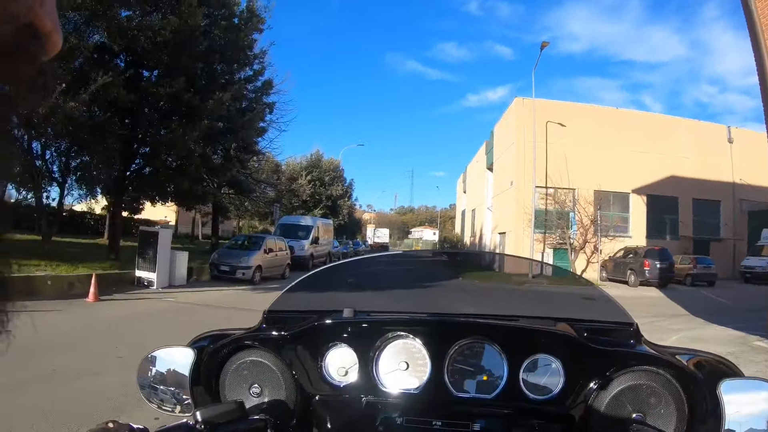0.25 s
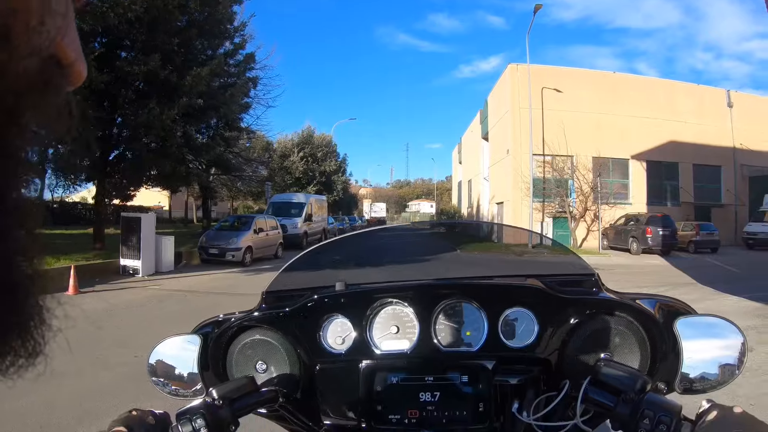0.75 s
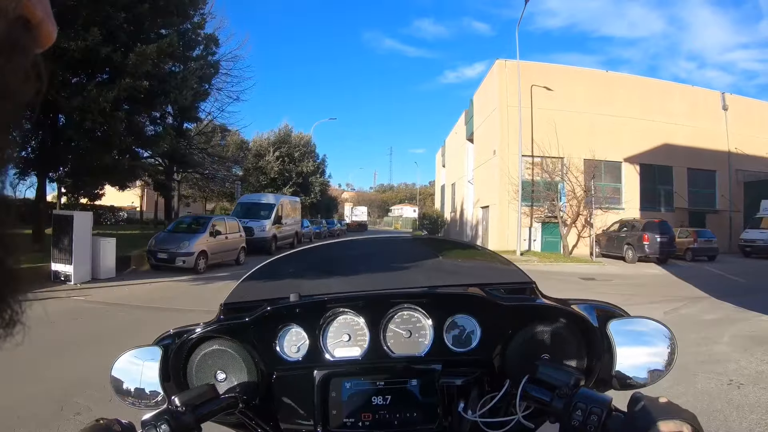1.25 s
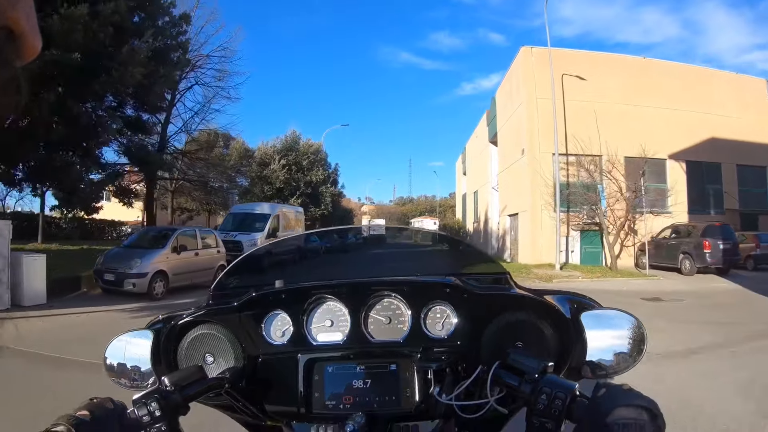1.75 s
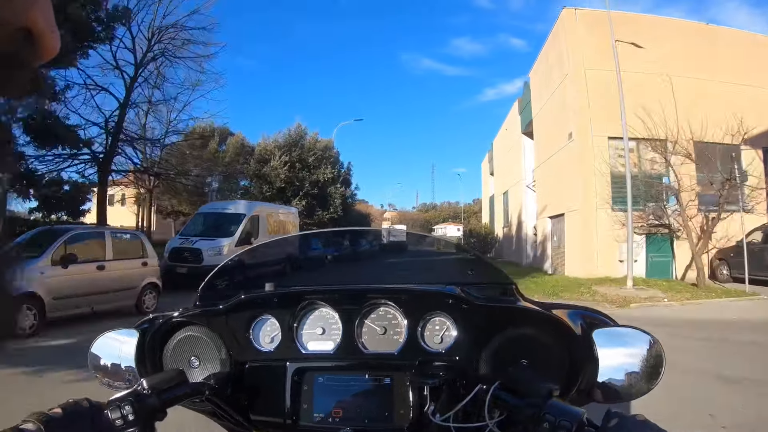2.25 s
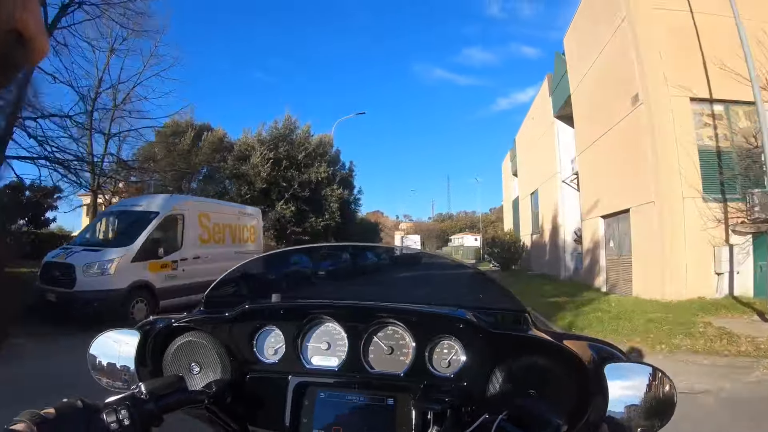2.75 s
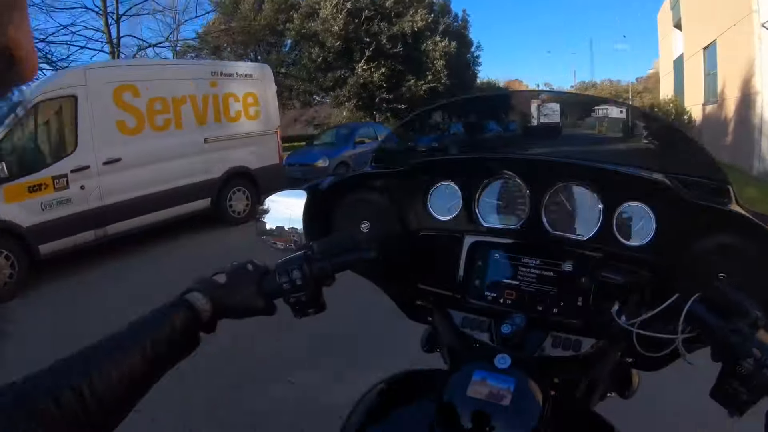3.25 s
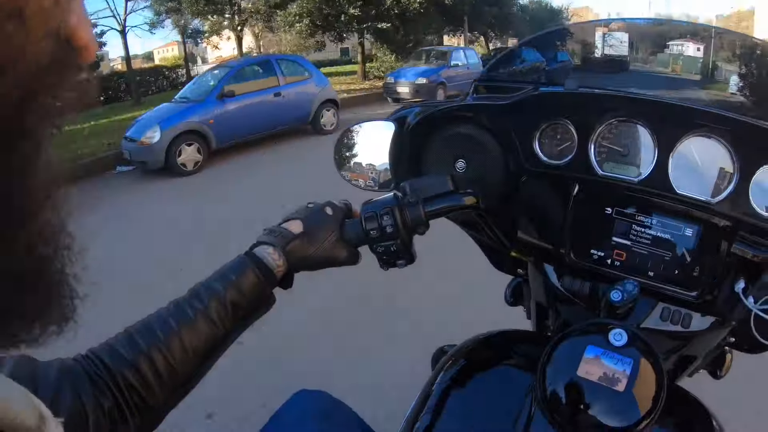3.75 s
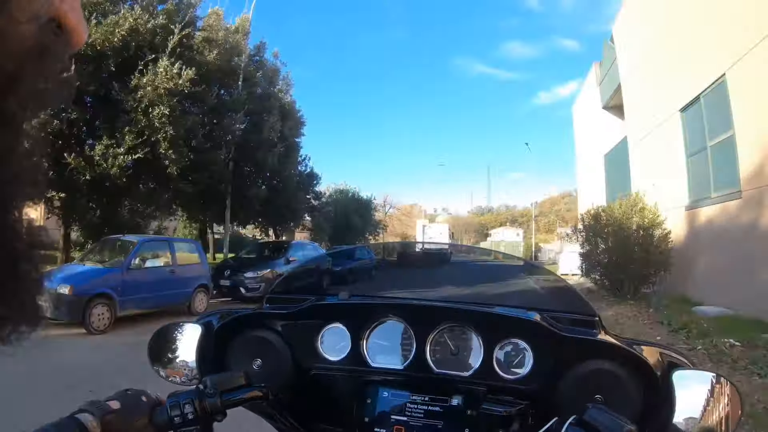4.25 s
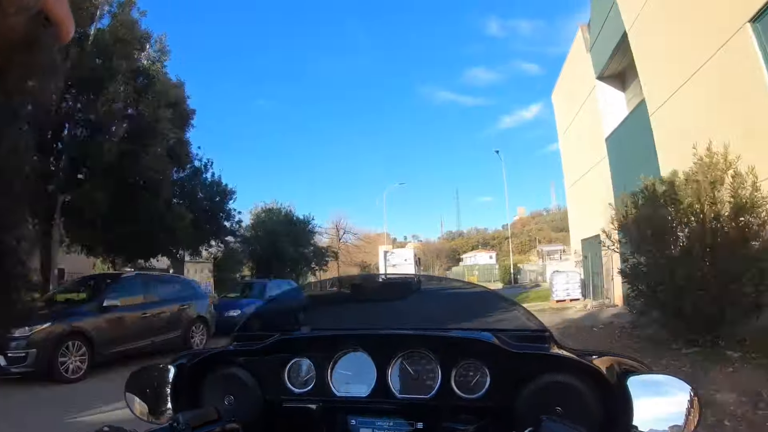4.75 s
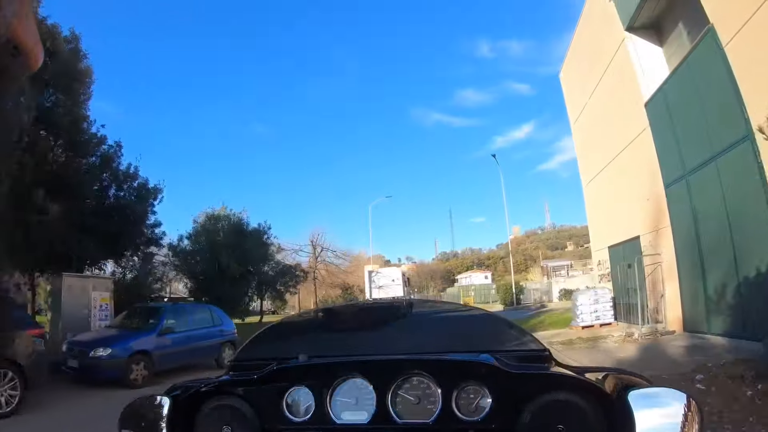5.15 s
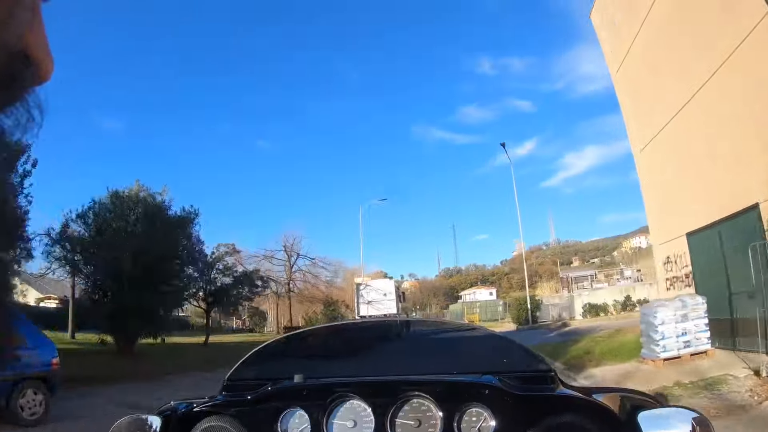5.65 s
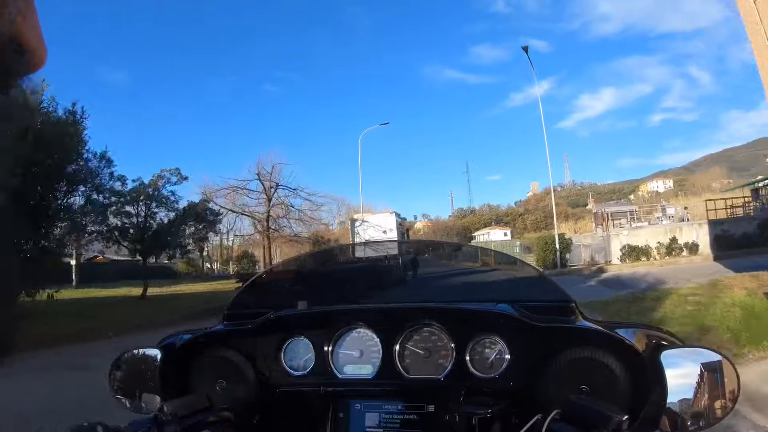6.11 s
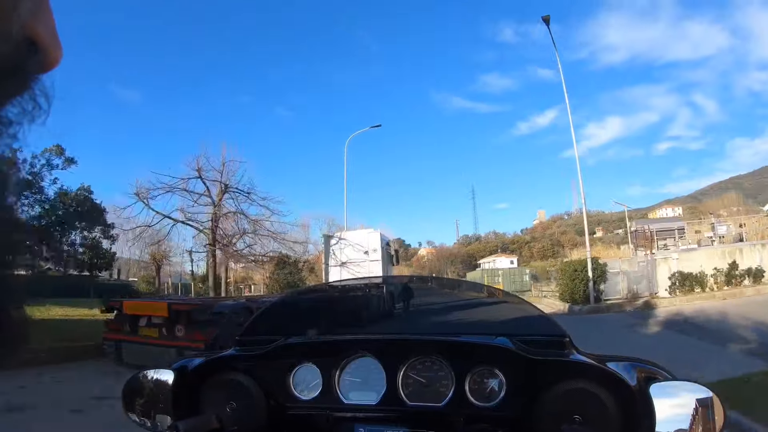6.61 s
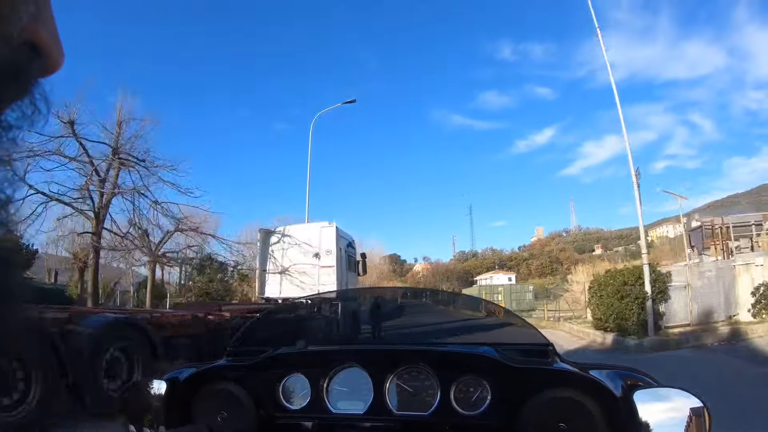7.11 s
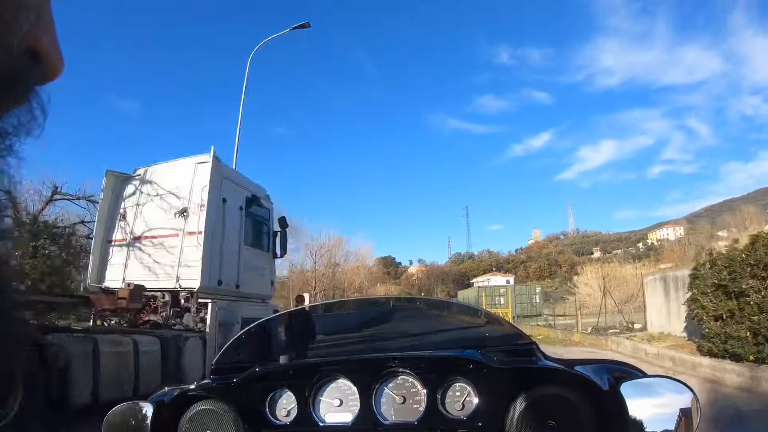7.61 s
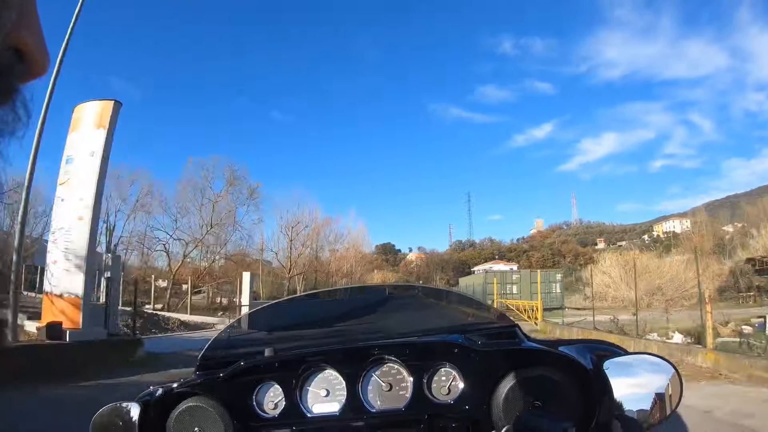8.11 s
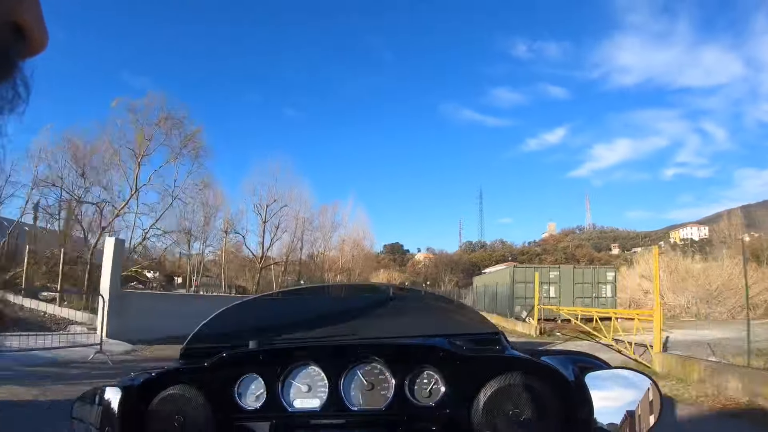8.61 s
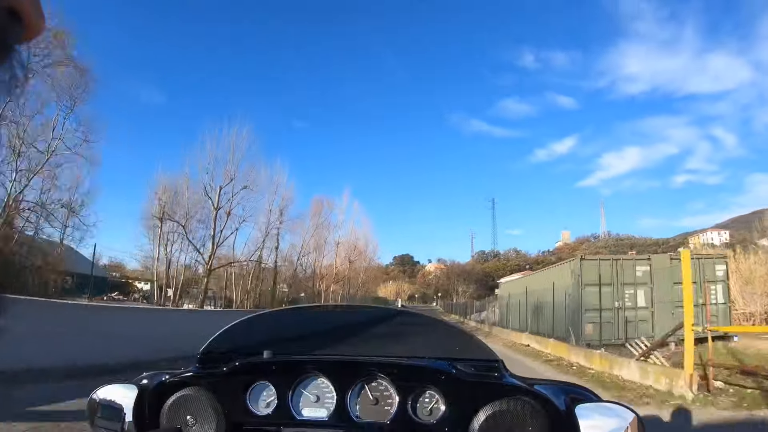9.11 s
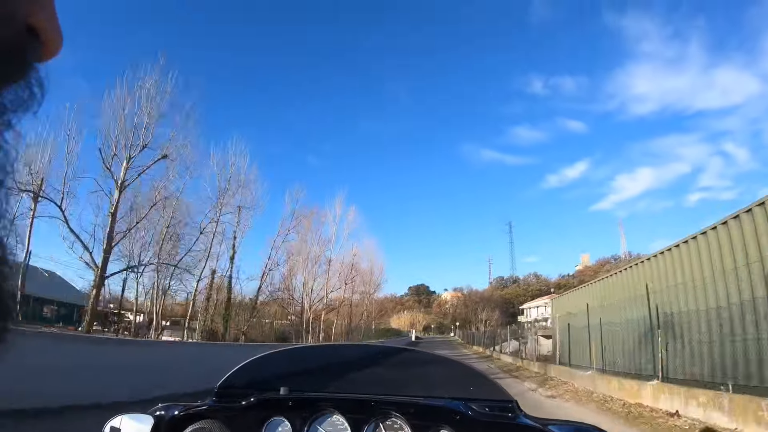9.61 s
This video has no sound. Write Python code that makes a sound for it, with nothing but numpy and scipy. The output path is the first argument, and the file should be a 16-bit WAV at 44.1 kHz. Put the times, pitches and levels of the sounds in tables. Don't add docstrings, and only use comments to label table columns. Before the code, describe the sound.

Heard from the rider's helmet, a heavy motorcycle thumps, roars and revs, drops at a gear change, then climbs again as gusts and strap snaps build.

```python
import sys
import numpy as np
from scipy import signal
from scipy.io import wavfile
from scipy.ndimage import uniform_filter1d

SR = 44100
rng = np.random.default_rng(int(sys.argv[2]) if len(sys.argv) > 2 else 0)


def store_wav(level_fs):
    pcm = np.round(np.clip(np.atleast_2d(level_fs), -1, 1) * 32767)
    wavfile.write(sys.argv[1], SR, pcm.T.astype(np.int16))


def gain_from_db(level_db):
    decades = np.asarray(level_db, float) / 20
    return 10 ** decades


N = 435266
T = np.arange(N) / SR


def evened(x):
    return x / np.sqrt(np.mean(abs(x) ** 2) + 1e-20)


def read(points, hz):
    f, value = np.transpose(points)
    return np.interp(np.log(hz + 1), np.log(f + 1), value)


def curve(rows, column, t=T):
    rows = np.array(rows)
    return np.interp(t, rows[:, 0], rows[:, column])


def drift(per_s):
    width = round(SR / per_s)
    once = uniform_filter1d(rng.standard_normal(N), width)
    return evened(uniform_filter1d(once, width))


def ringing(hz, width, size=N):
    turn = np.exp(2j * np.pi * np.cumsum(hz * np.ones(size)) / SR)
    r = np.exp(-np.pi * width / SR)
    slow = rng.standard_normal(size) / turn
    for _ in range(2):
        slow = signal.lfilter([1], [1, -r], slow)
    return evened((turn * slow).real)


# start_s, sheltered_share (0-1)
SHELTER = [(1.25, 0.073), (1.5, 0.054), (1.8, 0.43), (4.9, 0.77), (5.05, 0.86)]
# freq_hz, likeness (-1 to 1)
SAME = [(60, 0.88), (120, 0.63), (240, 0.8), (480, 0.67), (950, -0.54), (1890, -0.76), (3770, 0.5),
        (7520, -0.17), (15000, -0.01)]
# freq_hz, left_over_right_db
LEAN = [(60, -4.5), (110, -11), (200, -7), (380, -15), (700, -7.5), (1290, 3.5), (2380, 3), (4400, -5),
        (8120, 3), (15000, 5)]


def noise(open_db, shut_db, patchy_db, size=1024):
    frames, hz = 4 * N // size + 5, np.fft.rfftfreq(size, 1 / SR)
    a, b, c, d, patches = rng.standard_normal((frames, len(hz), 5)).T
    patches = uniform_filter1d(patches, 8, 0)
    patches = evened(uniform_filter1d(patches, 10, 1))
    share = curve(SHELTER, 1, np.arange(frames) * size / 4 / SR)
    colour_db = np.outer(read(open_db, hz), 1 - share) + np.outer(read(shut_db, hz), share)
    colour = gain_from_db(colour_db)
    colour *= gain_from_db(patchy_db * patches) / np.linalg.norm(colour, axis=0)
    same = np.clip(read(SAME, hz), -.99, .99)[:, None]
    lean = gain_from_db(read(LEAN, hz) / 2)[:, None]
    colour = colour * 2 / np.sqrt(lean ** 2 + lean ** -2 + 2 * same)
    shared = (a + 1j * b) * colour
    other = (c + 1j * d) * colour
    left = lean * shared
    right = (same * shared + np.sqrt(1 - same ** 2) * other) / lean
    ports = signal.istft(np.array([left, right]), nperseg=size, noverlap=3 * size // 4)[1][:, :N]
    return ports / np.sqrt(np.mean(ports.mean(0) ** 2))


FIRST_FIRING, SECOND_FIRING = .38, .38 + 315 / 720
# cycle_multiple, level_db, extra_off_load_db
PUFF = [(1, -12, 6), (2, -19, -2), (3, -15, 0), (4, -1, 3), (5, 3, -1), (6, -.5, -2.5), (7, -3.5, -1),
        (8, 6, 0), (9, -13, 6), (10, -5, 1), (11, -9, 0.5), (12, -10, 0), (13, -18, -2), (14, -9, 0.5),
        (15, -16, -3.5), (16, -9.5, -1.5), (17, -11, 1), (18, -6, 0.5), (19, -6, 8), (20, -14, 2)]
# freq_hz, level_db
PIPE = [(20, -10), (45, -1.5), (60, 3), (75, 2.5), (90, 2.5), (110, 2.5), (135, -0.5), (165, -8.5),
        (200, -10.5), (255, -11.5), (400, -32)]
# start_s, spread_db
UNEVEN = [(0, 2), (.5, .8), (4.8, .9), (5.05, 5), (5.7, 3), (6.1, 1.5), (8.9, 2.2), (9.4, 4)]
# start_s, level_db
EFFORT = [(0, -18.5), (.1, -17), (.8, -14.5), (1.24, -15.5), (1.73, -18), (2.2, -14.5), (4.73, -15),
          (4.86, -15), (5.06, -33), (5.36, -36.5), (5.5, -25.5), (5.85, -24.5), (6.57, -17.5), (7.5, -17.5),
          (8.4, -18.5), (8.8, -16.5), (9.15, -17), (9.87, -23)]
# start_s, load (0-1)
PULL = [(0, .1), (.3, .2), (.75, 1), (1.3, .6), (1.9, 1), (3.35, 1), (3.6, 0), (5.7, 0), (6.5, 1), (9.3, 1),
        (9.65, 0)]
# start_s, level_db
ROCK = [(2.9, -46.5), (3.2, -31), (3.6, -26), (4.8, -27), (5.0, -53), (7.7, -50), (8.1, -31), (9.1, -36),
        (9.6, -28)]
SHAKE_DB, SHAKE_PER_EFFORT = -22, 0.58


def exhaust(hz, cycle):
    thump, slack = np.zeros(N, complex), 1 - curve(PULL, 1)
    for place, cylinder_db in ((FIRST_FIRING, 0), (SECOND_FIRING, -.7)):
        chances = rng.standard_normal((2, 400))
        size, late = [curve(UNEVEN, 1) * np.interp(cycle - place, np.arange(400), v) for v in chances]
        angle = cycle - place - .004 * late
        puff = np.zeros(N, complex)
        for multiple, level_db, off_load_db in PUFF:
            gain_db = level_db + off_load_db * slack + read(PIPE, multiple * hz)
            puff += gain_from_db(gain_db) * np.exp(2j * np.pi * multiple * angle)
        thump += gain_from_db(cylinder_db + size) * puff
    thump = gain_from_db(curve(EFFORT, 1)) * evened(thump) * np.exp(2j * np.pi * .05)
    shake_db = SHAKE_DB + SHAKE_PER_EFFORT * (curve(EFFORT, 1) + 16)
    shake_db = np.minimum(shake_db, 1.8 * hz - 61)
    shake = gain_from_db(shake_db + 1.2 * drift(6)) * np.exp(2j * np.pi * (2 * cycle + .08 - .25 * slack))
    shake += gain_from_db(curve(ROCK, 1) + 1.5 * drift(6)) * np.exp(2j * np.pi * (3 * cycle - .05))
    ports = gain_from_db([[-1.2], [1.2]]) * np.exp([[.12j], [-.12j]])
    return np.sqrt(2) * (ports * (thump + shake)).real


# freq_hz, level_db (per Hz)
ROAR_OPEN = [(60, -26.5), (200, 6), (360, 1), (430, -3), (545, -2), (820, -12), (1050, -14), (1730, -26.5),
             (2040, -35.5), (3300, -35), (6000, -64), (16000, -83.5)]
# freq_hz, level_db (per Hz)
ROAR_SHUT = [(60, -13), (200, 4), (350, -4), (421, -8.5), (484, -5.5), (545, 0.5), (713, -5), (1210, -17.5),
             (2000, -18.5), (3300, -33), (6500, -51), (7200, -82.5), (16000, -110)]
# freq_hz, level_db (per Hz)
HISS_OPEN = [(2500, 4.5), (3500, 0.5), (4260, -3), (5000, -5.5), (5710, -3), (6800, -8.5), (7660, -7),
             (8600, -15.5), (9460, -18), (12000, -25.5), (15500, -27.5)]
# freq_hz, level_db (per Hz)
HISS_SHUT = [(2500, -15), (3500, -13), (3750, -2), (4270, 0), (5000, -5.5), (5800, -5), (6550, -11.5),
             (6950, -25), (8500, -27.5), (10000, -41.5), (15500, -72)]
# pitch_hz, width_hz
PANELS = [(423, 24), (548, 34), (1045, 75), (1540, 110), (2040, 170), (1150, 450)]
# over_roar_db, extra_under_load_db, facing_share (dB per dB)
PANEL_DB = [(-10, 1, .15), (-15, 3, .2), (-22, 2, 0), (-27, -8, .25), (-30, 0, .3), (-18, -8, -.3)]
# start_s,
# level_db
FACING = [(0, 8), (.1, 12.5), (1.24, 12.5), (1.73, 0), (2.2, 1), (3.14, 4), (3.2, 8.5), (3.28, 6), (3.6, 8),
          (3.9, 10.5), (4.3, 6.5), (4.86, 1.5), (5.05, -11), (5.55, -10.5), (5.8, -2.5), (6.2, 0.5), (8, 0),
          (9.87, -3)]
ROAR_DB, ROAR_PER_FACING, ROAR_PULL_DB, ROAR_PER_AIR, HISS_DB = -41, 0.56, 3, 0.11, -57.5


def casing(cycle):
    beat = np.zeros(N)
    for place in (FIRST_FIRING, SECOND_FIRING):
        beat += np.exp(0.42 * (np.cos(2 * np.pi * (cycle - place - .05)) - 1))
    throb = evened(1.6 + beat) * gain_from_db(.7 * drift(70))
    pull, facing = curve(PULL, 1), curve(FACING, 1)
    panels = np.zeros(N)
    for (hz, width), (over_db, load_db, share) in zip(PANELS, PANEL_DB):
        panels += gain_from_db(over_db + load_db * pull + share * facing) * ringing(hz, width)
    roar_db = ROAR_DB + ROAR_PER_FACING * facing + ROAR_PULL_DB * pull
    roar_db += ROAR_PER_AIR * (curve(AIR, 1) + 30)
    body = noise(ROAR_OPEN, ROAR_SHUT, 0.69) + gain_from_db([[-3], [2]]) * panels
    roar = gain_from_db(roar_db) * throb * body
    hiss_level = gain_from_db(HISS_DB + facing + 1.1 * drift(200.0)) * evened(2.1 + beat)
    return roar + hiss_level * noise(HISS_OPEN, HISS_SHUT, 1.0)


# start_s, level_db
WALL = [
    (0, -25.5),
    (.38, -30),
    (.55, -57.5),
]


def wall():
    return gain_from_db(curve(WALL, 1)) * ringing(167, 36)


# start_s, level_db
AIR = [(0, -26), (.5, -30), (2.4, -28), (4.5, -29), (5.05, -26), (5.35, -30), (5.85, -31), (6.6, -24),
       (8.1, -20), (9.45, -20), (9.6, -23)]
# freq_hz, level_db (per Hz)
WIND = [(12, -20), (25, -11), (45, 2.5), (110, -1), (180, -4.5), (300, -22.5), (600, -31), (1500, -46),
        (3000, -79.5), (9000, -120)]
# start_s,
# level_db (peak), brightness_db, thump_db
BUFFETS = [(1.196, -33.5, -19, 25), (2.085, -33.5, -33, -5), (2.379, -33, -33, 22.5),
           (2.537, -27, -25, 11.5), (2.647, -33.5, -17, 23), (2.68, -20, -20, 12.5),
           (3.457, -27.5, -11, 17.5), (3.799, -36, -42.5, 14.5), (4.586, -29, -7, -6.5),
           (4.789, -22.5, -20.5, -10), (4.895, -32.5, -8, 20), (4.96, -28, -11, 5), (5.08, -26.5, -8, -3),
           (5.135, -34.5, -3, 2), (5.452, -35, -17, 20), (5.484, -31, -15, 12), (5.513, -31.5, -8, 12),
           (5.657, -35.5, -7, 22.5), (5.803, -30, -10, 1), (6.24, -51, -15, -4), (6.402, -24, -14, 0),
           (6.499, -33.5, -21, 18.5), (6.549, -23, -35, 9),
           (7.169, -32, -25, -1), (7.216, -16, -29, -7), (7.282, -23, -30, -5), (7.375, -22, -25, 10.5),
         (7.43, -23.5, -23, -2.5), (7.487, -26.5, -23, -5), (7.567, -22.5, -23, 8), (7.744, -40, -18, -11),
         (7.86, -26, -20.5, -6), (7.99, -19.5, -9, 13.5), (8.019, -15, -14, -1.5), (8.124, -21, -16, -15),
         (8.257, -31, -22, 17), (8.307, -17.5, -25, 6), (8.384, -30, -16.5, -3), (8.406, -22, -14, 4),
         (8.472, -25, -25, 0), (8.63, -19, -11.5, -9), (8.835, -21, -23, -10), (8.872, -22, -25, -3),
         (8.944, -21, -31, 1), (8.971, -18, -26, -1.5), (9.084, -20, -22, 6), (9.189, -21, -24, -4),
         (9.214, -17.5, -21, 0), (9.255, -19, -14, -1), (9.387, -21.5, -20, 5), (9.41, -16.5, -17, 7),
         (9.473, -26.5, -15, -5), (9.658, -30, -25, -5.5), (9.03, -23, -21, 2), (9.29, -30, -16, 2),
         (9.5, -36, -7, -7), (9.54, -36, -5, -2), (8.335, -38.5, -16, -4), (8.855, -21.5, -12, -3),
         (9.855, -37.5, -1, -4)]
EDDIES_FROM_S, EDDIES_PER_S = 6.3, 22
EDDY_DB, EDDY_BRIGHT_DB, EDDY_THUMP_DB = -11.5, -16.5, 7.5


def buffet_rows():
    lasting_s = N / SR - EDDIES_FROM_S
    count = round(lasting_s * EDDIES_PER_S)
    when, a, b, c = rng.random((count, 4)).T
    when = EDDIES_FROM_S + lasting_s * when
    level_db = curve(AIR, 1, when) + EDDY_DB + 8 * (a - .5)
    bright_db = EDDY_BRIGHT_DB + 8 * (b - .5)
    thump_db = EDDY_THUMP_DB + 12 * (c - .5)
    eddies = np.transpose([when, level_db, bright_db, thump_db])
    return BUFFETS + list(eddies)


# freq_hz, level_db (per Hz)
THUMP = [(50, -17), (120, 4.5), (250, -1.5), (400, -20), (800, -56.5), (3000, -110)]
# freq_hz, level_db (per Hz)
DULL = [(150, -2.5), (400, 8.5), (700, 1), (1200, -8), (2200, -31), (6000, -93)]
# freq_hz, level_db (per Hz)
BRIGHT = [(700, -26.5), (1500, 0), (2500, -14.5), (4000, -21), (7000, -50.5), (16000, -93)]
# rise_s, fall_s
SWELLS = [(.006, .016), (.005, .010), (.009, .007)]
LEAD_S = .004


def wind():
    air_db = curve(AIR, 1) + 2.0 * drift(30.0) + 0.88 * drift(8.8)
    out = gain_from_db(air_db) * noise(WIND, WIND, 1.0, size=2048)
    rows = buffet_rows()
    parts = ((3, THUMP, -12.0), (1, DULL, -7.5), (2, BRIGHT, -12.5))  # column, colour, dB
    for (column, colour, part_db), (rise, fall) in zip(parts, SWELLS):
        strength = np.zeros(N)
        for row in rows:
            extra_db = row[column] if column > 1 else 0
            strength[round((row[0] - LEAD_S) * SR)] = gain_from_db(row[1] + extra_db + part_db)
        shape = (1 - np.exp(-T[:5000] / rise)) ** 2 * np.exp(-T[:5000] / fall)
        swell = signal.oaconvolve(strength, shape / shape.max())[:N]
        out += swell * noise(colour, colour, 0.66, size=256)
    return out


# start_s,
# end_s, from_hz, to_hz, level_db
GLINTS = [(.05, .6, 2080, 2100, -55), (.45, 1.3, 1040, 1044, -50), (.55, 1.3, 627, 637, -43),
          (1.92, 2.25, 545, 560, -37.5), (2.05, 2.5, 1580, 1710, -57), (3.05, 3.55, 541, 578, -40.5),
          (3.3, 4.0, 1506, 1550, -53), (3.65, 4.15, 635, 650, -46.5), (4.1, 4.6, 1250, 1254, -54),
          (4.55, 4.92, 866, 857, -48.5), (4.548, 4.92, 660, 623, -44.5), (5.8, 6.3, 2300, 2300, -64),
          (7.97, 8.098, 934, 860, -37), (9.679, 9.873, 380, 360, -40.5), (6.054, 6.35, 1940, 1890, -57),
          (8.3, 8.65, 1780, 1957, -59)]


def glints():
    out = np.zeros(N)
    for start, end, from_hz, to_hz, db in GLINTS:
        along = np.clip(T[:SR] / (end - start), 0, 1)
        buzz = ringing(from_hz + (to_hz - from_hz) * along, from_hz / 18, size=SR)
        part = out[round(start * SR):][:SR]
        part += (gain_from_db(db) * np.sin(np.pi * along) * buzz)[:len(part)]
    return out


# teeth_per_cycle, on_load_db, off_load_db
MESH = [(25.4, 1, -16), (31.8, -2, 4), (36.2, -8, 14), (42, -10, 7), (47, -14, 5), (63.2, 4, -13),
        (92.8, 0, -13)]
# start_s, gearbox_over_engine_speed
CLUTCH = [(1.3, 0.79), (1.76, 1), (9.87, 1)]
# pitch_hz, width_hz, extra_db
CASE = [(550, 55, 20), (705, 45, 18), (930, 40, 6), (1300, 200, 9), (1640, 100, 11), (1950, 200, 6)]
# start_s, end_s
FIRST_GEAR = (1.2, 4.75)
ENGAGE_S, CASE_DB = .45, -61
MESH_BEAT, MESH_BREAK_DB = .35, 1.5


def whine(hz, cycle):
    box = hz * curve(CLUTCH, 1)
    turns = np.cumsum(box * (1 + .018 * drift(120))) / SR
    start, end = FIRST_GEAR
    sounding = np.clip(np.minimum(T - start, end - T) / ENGAGE_S, 0, 1) ** 2
    pull, out = curve(PULL, 1), np.zeros(N)
    for teeth, load_db, slack_db in MESH:
        ring_db = sum(db * np.exp(-((teeth * box - f) / width) ** 2) for f, width, db in CASE)
        level_db = CASE_DB + ring_db + slack_db + (load_db - slack_db) * pull
        level_db = level_db + MESH_BREAK_DB * drift(35)
        out += gain_from_db(level_db) * np.sin(2 * np.pi * teeth * turns)
    stroke = 1 + MESH_BEAT * np.cos(2 * np.pi * (cycle - FIRST_FIRING - .2))
    return out * sounding * stroke / 1.25


# start_s, level_db (peak)
TICKS = [(1.66, -68), (1.91, -68), (2.165, -71), (2.335, -68), (2.395, -68), (2.75, -67.5), (3.12, -69),
         (3.2, -66), (3.225, -69), (3.31, -69), (3.7, -69.5), (3.78, -68), (4.55, -71), (4.78, -67),
         (4.85, -70), (2.223, -64), (2.6082, -63.5), (2.6565, -53), (2.6716, -52.5), (2.7095, -61.5),
         (2.948, -73), (3.6378, -74), (4.0097, -70), (4.196, -53), (4.2246, -55.5), (4.269, -67.5),
         (4.2882, -59), (4.315, -61.5), (4.4962, -66), (4.6401, -62.5), (4.688, -60.5), (4.741, -64),
         (4.8974, -53.5), (4.9764, -52), (5.4822, -71), (5.811, -70.5), (6.0906, -73), (6.1542, -74),
         (6.2458, -71), (6.2937, -68), (6.5035, -67), (6.6, -70.5), (6.698, -72), (6.9432, -66),
         (7.1953, -56), (7.2122, -53), (7.7244, -65.5), (7.8989, -65), (8.213, -65.5), (8.3466, -69),
         (8.5147, -70), (8.8524, -70), (8.8848, -63.5), (9.2314, -73), (9.7272, -66.5)]
# start_s, level_db (peak)
LAST_TICK = (9.852, -50)


def faint_ticks():
    ticks = np.zeros(N)
    for s, db in TICKS + [LAST_TICK]:
        ticks[round(s * SR)] = gain_from_db(db + 0.5)
    tick = gain_from_db(-60 * T[:300] / 0.019) * rng.standard_normal(300)
    return signal.oaconvolve(ticks, tick)[:N]


# start_s, level_db
SNAPS = [(2.085, -45), (3.395, -39.5), (4.638, -31), (4.687, -32), (4.738, -32.5), (4.79, -37),
         (5.804, -40), (6.239, -41), (7.175, -36), (7.294, -31), (7.316, -32), (7.48, -31), (8.254, -36.5),
         (8.327, -32.5), (8.368, -35), (8.387, -36.5), (8.52, -39.5), (9.403, -24), (7.215, -30),
         (7.277, -34), (7.394, -34), (7.432, -41), (7.983, -28.5), (8.265, -24), (8.31, -27), (8.403, -25),
         (8.448, -36), (8.468, -31), (8.489, -27), (8.874, -26), (8.912, -30), (8.947, -38.5), (8.97, -34),
         (9.021, -34), (9.039, -40), (9.087, -37), (9.12, -44), (9.179, -34), (9.216, -21), (9.23, -20),
         (9.258, -24.5), (9.287, -26.5), (9.37, -32), (9.395, -24), (9.419, -24.5), (9.472, -31),
         (9.658, -27.5), (9.687, -33), (9.754, -41)]
# freq_hz, level_db (per Hz)
SNAP = [(200, -12), (500, 0), (1100, -4), (2200, -16), (3200, -30), (4500, -46), (16000, -100)]
# low_hz, high_hz
KNOCK_HZ = (380, 1300)
KNOCK_DB, SNAP_DB, SNAP_RISE_S, SNAP_FALL_S = 19, -3, .0007, .004


def snaps():
    strength = np.zeros(N)
    for s, db in SNAPS:
        strength[round(s * SR)] = gain_from_db(db + SNAP_DB)
    shape = (1 - np.exp(-T[:2000] / SNAP_RISE_S)) * np.exp(-T[:2000] / SNAP_FALL_S)
    knock = gain_from_db(KNOCK_DB) * signal.lfilter(*signal.butter(2, KNOCK_HZ, 'band', fs=SR), strength)
    burst = signal.oaconvolve(strength, shape / shape.max())[:N]
    return knock + burst * noise(SNAP, SNAP, 0, size=256)


# start_s, level_db (peak)
SHIFT = [
    (5.0765, -50),
    (5.13, -52.5),
]
# pitch_hz, level_db, t60_s
GEARBOX = [(605, 4, 0.045), (1200, -16, 0.24), (1650, -23, 0.091), (2170, -22.5, 0.36)]
DAMPING = 2.5


def gear_shift():
    t, hits = T[:4000], np.zeros(N)
    for s, db in SHIFT:
        hits[round(s * SR)] = gain_from_db(db + 19.5)
    ring = sum(gain_from_db(db - 60 * DAMPING * t / t60) * np.sin(2 * np.pi * hz * t) for hz, db, t60 in GEARBOX)
    rattle = gain_from_db(-19.0 - 60 * t / 0.24) * rng.standard_normal(len(t))
    rattle = signal.lfilter(*signal.butter(3, [3400, 5800], 'band', fs=SR), rattle)
    return signal.oaconvolve(hits, ring + rattle)[:N]


# start_s, level_db, low_ring_hz, high_ring_hz
POST = [
    (7.96, -63, 1000, 2440),
    (7.99, -35, 920, 2330),
    (8.03, -36.5, 864, 2100),
    (8.07, -35, 875, 2160),
    (8.12, -49.5, 980, 1880),
]


def post():
    near = gain_from_db(curve(POST, 1)) * (T > POST[0][0]) * (T < POST[-1][0])
    low_hz, high_hz = curve(POST, 2), curve(POST, 3)
    echo = ringing(low_hz, 150)
    echo += gain_from_db(-7) * ringing(1.45 * low_hz, 350)
    echo += gain_from_db(-14) * ringing(high_hz, 300)
    return near * echo


# start_s, speed_rpm
SPEED = [(0.0, 1277), (0.42, 1395), (0.52, 1605), (0.91, 1956), (1.16, 1693), (1.76, 1701), (2.32, 2158),
         (3.09, 2615), (3.64, 2676), (4.51, 2634), (5.12, 1596), (5.75, 1575), (6.52, 1788), (7.19, 2122),
         (7.84, 2518), (8.64, 2931), (9.02, 3046), (9.87, 2966)]


def scene():
    hz = curve(SPEED, 1) / 120
    cycle = np.cumsum(hz) / SR
    machine = exhaust(hz, cycle) + casing(cycle) + glints() + whine(hz, cycle) + gear_shift()
    helmet = wind() + faint_ticks() + snaps()
    return machine + helmet + wall() + post()


def top_cut(x):
    return signal.sosfilt(signal.butter(12, 15710, fs=SR, output="sos"), x)


# start_s, level_db
DUCKS = [
    (2.67, -3),
    (3.47, -2.5),
    (3.88, -1.5),
    (4.18, -3),
]
# freq_hz, fade_db_per_s
FOLD = [(80, 61), (500, 31), (1300, 40), (4500, 45), (8000, 22)]
FOLD_S, DUCK_FALL_S, DUCK_BACK_S = 1.61, 0.028, 0.74


def record(dry):
    duck_db = np.zeros(N)
    for s, db in DUCKS:
        dip = np.minimum((T - s) / DUCK_FALL_S + 1, 1 - (T - s) / DUCK_BACK_S)
        duck_db += db * np.clip(dip, 0, 1)
    mid, side = dry.mean(0) * gain_from_db(duck_db), (dry[0] - dry[1]) / 2
    hz, t, z = signal.stft(side, SR, nperseg=1024)
    fade_db = -np.outer(read(FOLD, hz), np.clip(t - FOLD_S, 0, 9))
    side = signal.istft(z * gain_from_db(fade_db), SR, nperseg=1024)[1][:N]
    ports = np.array([mid + side, mid - side])
    limited = 0.64 * np.tanh(ports / 0.7)
    return top_cut(limited)


dry = scene()
out = record(dry)
store_wav(out)
```